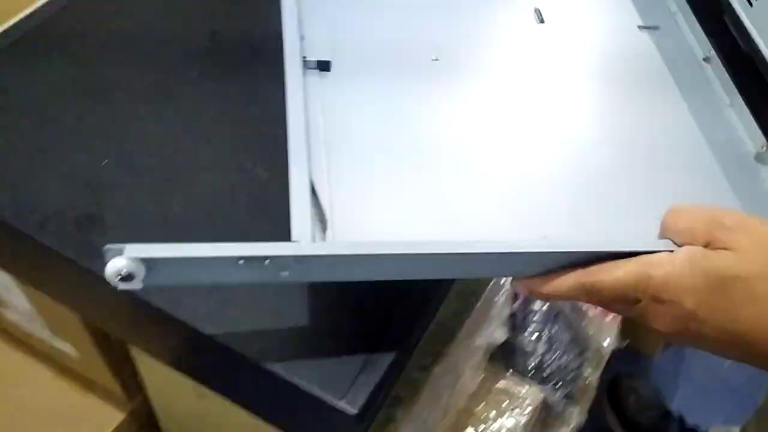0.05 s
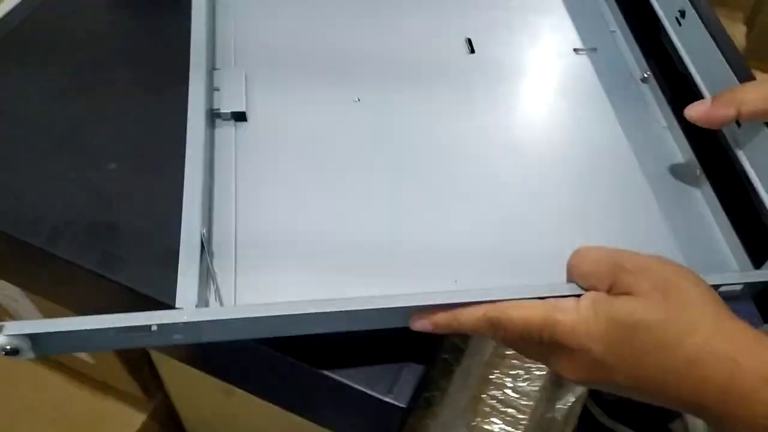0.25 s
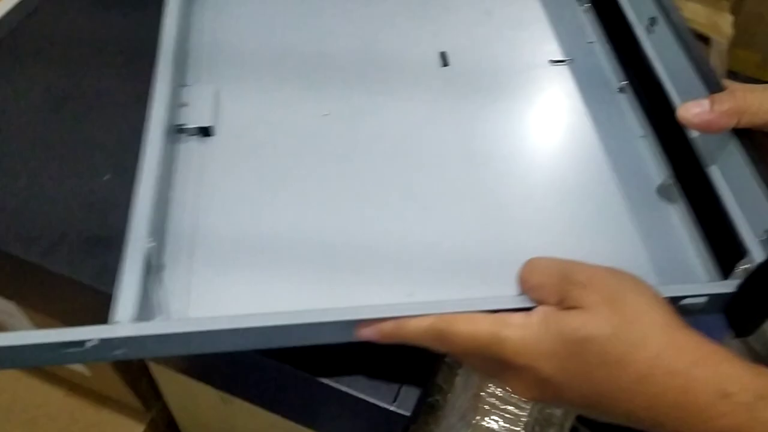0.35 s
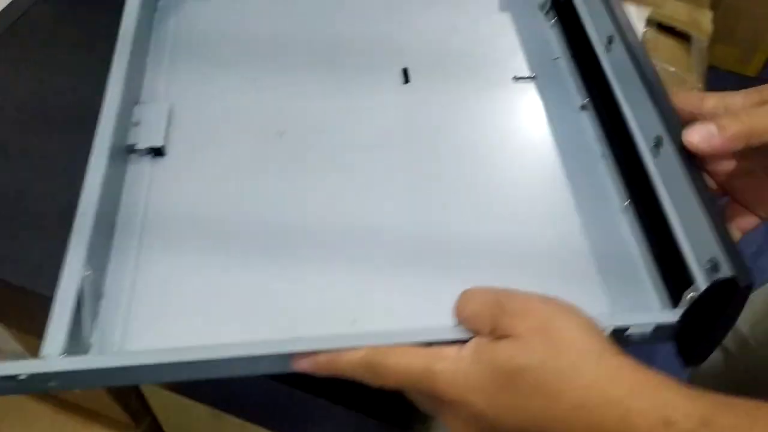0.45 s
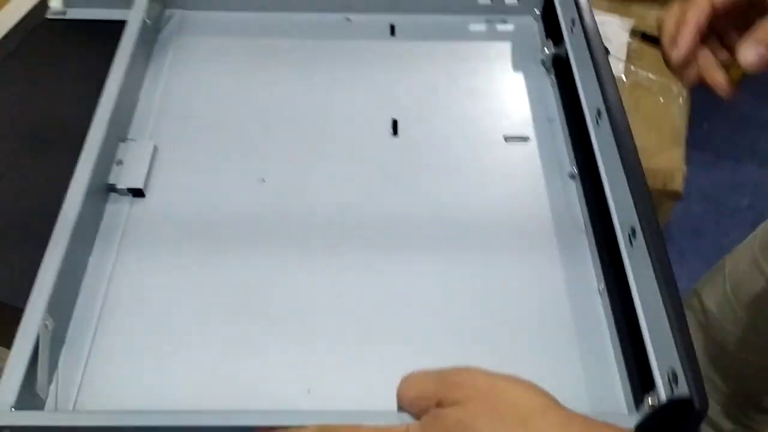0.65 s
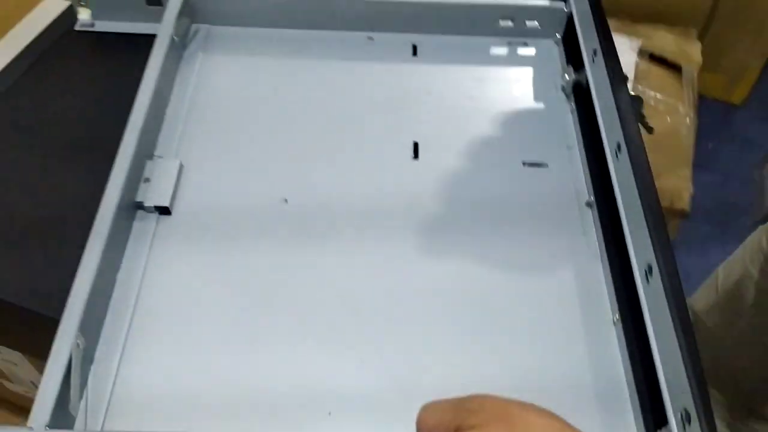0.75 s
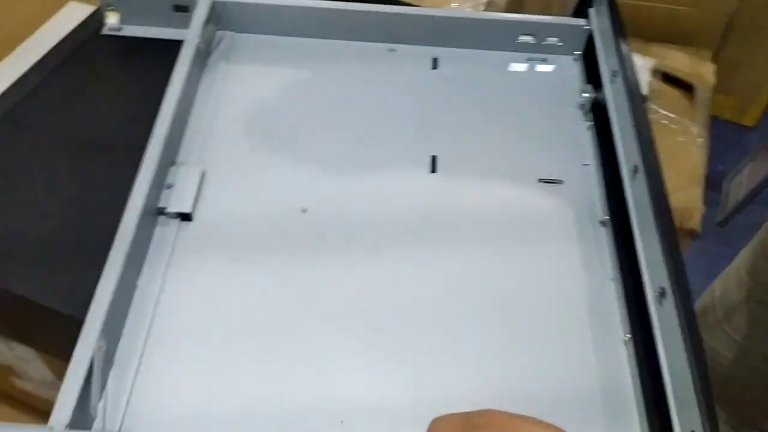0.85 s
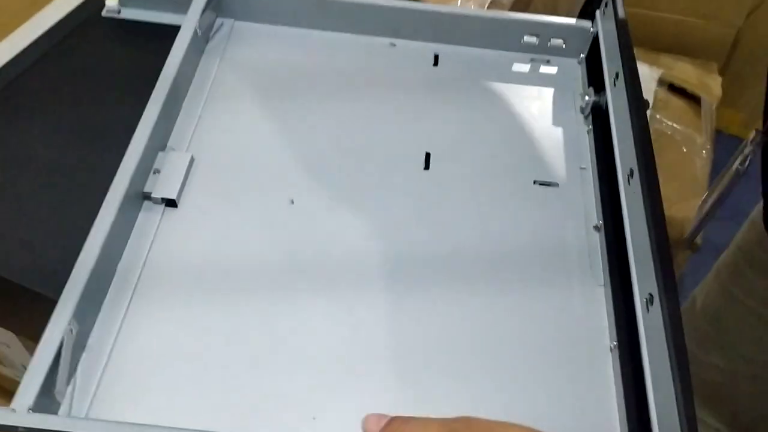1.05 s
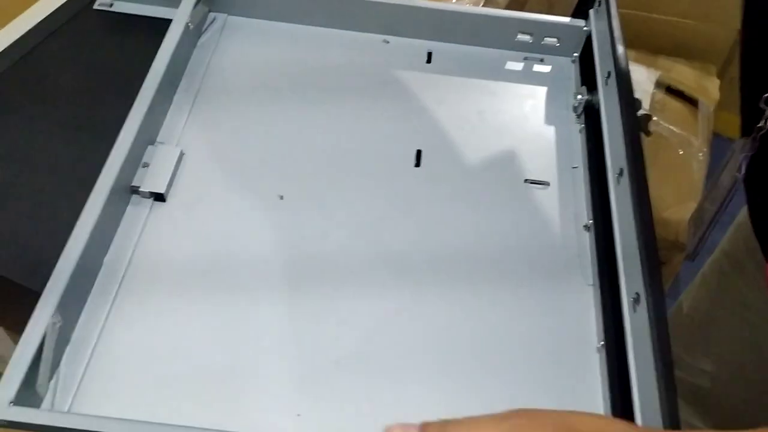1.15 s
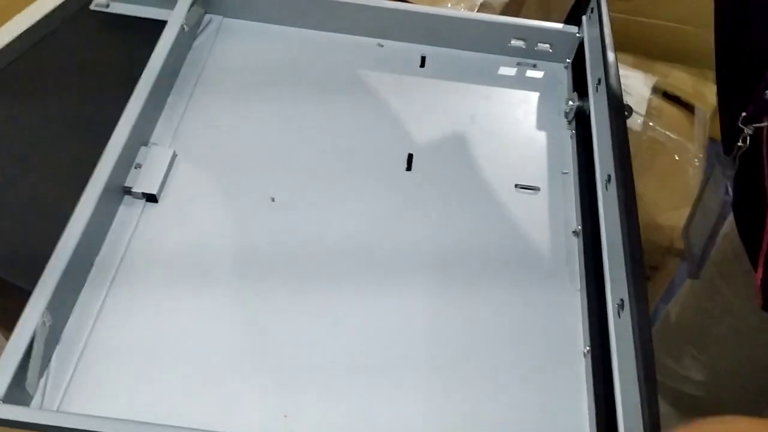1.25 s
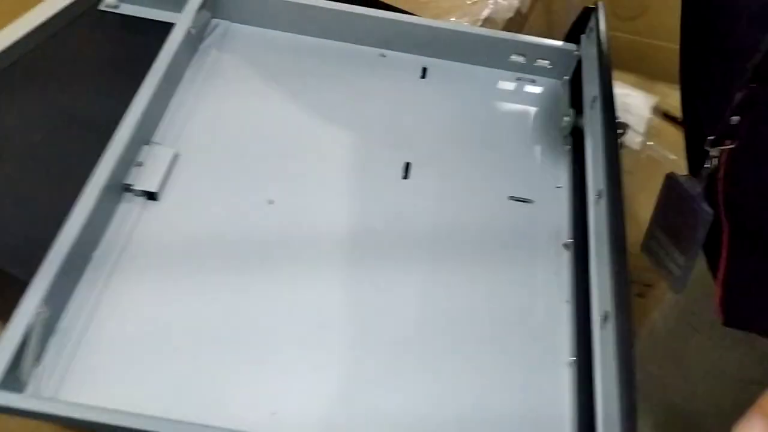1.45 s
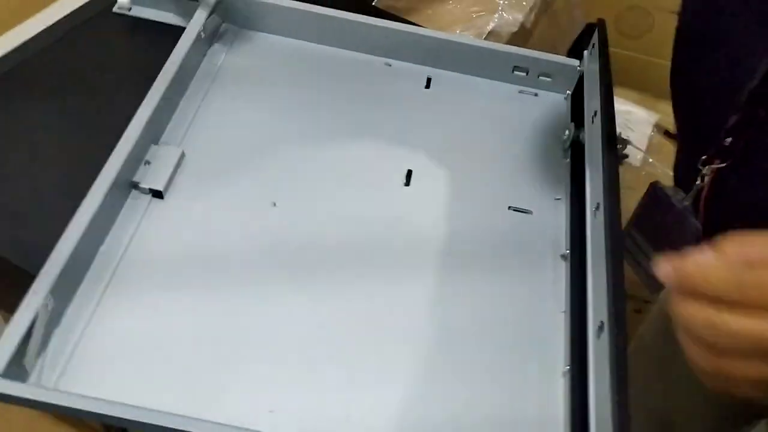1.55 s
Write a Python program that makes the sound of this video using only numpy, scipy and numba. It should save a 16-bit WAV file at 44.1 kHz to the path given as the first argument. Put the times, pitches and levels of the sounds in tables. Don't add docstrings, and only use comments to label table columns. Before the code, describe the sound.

Close up on a phone, a hollow metal tray slides with a stuttering drag, bangs down in rapid clattering hits, knocks once more, then settles to faint handling, a cloth brush and quiet indoor fan hum.

```python
import sys
import numpy as np
from scipy import signal
from scipy.fft import rfft, irfft
from scipy.io import wavfile
from scipy.ndimage import uniform_filter1d
from numba import njit

SR = 44100
rng = np.random.default_rng(int(sys.argv[2]) if len(sys.argv) > 2 else 0)


def waveform_to_disk(signal):
    frames = np.transpose(np.atleast_2d(signal))
    scaled = np.clip(frames, -1, 1) * 32767
    samples = np.round(scaled).astype(np.int16)
    wavfile.write(sys.argv[1], SR, samples)


def volts(x):
    e = np.asarray(x, float) / 20
    return 10 ** e


N = 70560

WIDE_HZ = 1410
OPPOSED = np.array([[1], [-1]])
RESTS_S = 0.509


def level(x, db):
    return x * volts(db) / np.sqrt(np.mean(x ** 2))


def curve(table):
    time_s, level_db = np.array(table).T
    return volts(np.interp(np.arange(N) / SR, time_s, level_db))


def colour_db(hz, table):
    table_hz, table_db = np.array(table).T
    return np.interp(np.log(hz), np.log(table_hz), table_db)


def walk(rate_hz):
    hold = int(SR / rate_hz)
    steps = np.repeat(rng.standard_normal(N // hold + 1), hold)
    return 1.3 * uniform_filter1d(uniform_filter1d(steps, hold), hold)[:N]


def grit(count, spread_db):
    size_db = spread_db * rng.exponential(size=count)
    return level(rng.standard_normal(count) * volts(size_db), 0)


def hiss(table, flicker_db):
    out = 0
    f = np.fft.rfftfreq(N, 1 / SR) + 1
    shape = volts(colour_db(f, table)) * (f > table[0][0])
    for hz in 25 * 2 ** np.arange(0, 9.6, 0.5):
        band = shape * np.cos(np.pi * np.clip(np.log2(f / hz), -0.5, 0.5))
        mid, side = irfft(rfft(rng.standard_normal((2, N))) * band, N)
        out = out + volts(flicker_db * walk(7.9)) * (mid + np.tanh(hz / WIDE_HZ) * side * OPPOSED)
    return level(out, 0)


@njit
def ring(x, poles, gains):
    out = np.zeros((2, len(x)))
    for m in range(len(poles)):
        z = 0j
        for i in range(len(x)):
            z = z * poles[m] + x[i]
            out[0, i] += (z * gains[0, m]).imag
            out[1, i] += (z * gains[1, m]).imag
    return out


def modes(x, hz, db, t60_s, start=None):
    in_step_hz = 888
    draw = rng.standard_normal((3, len(hz)))
    apart = np.tanh(hz / WIDE_HZ) * (np.pi / 4) * (1 + draw[0] * 1.39) * np.sign(draw[1])
    poles = np.exp(2j * np.pi * hz / SR - np.log(1000) / (t60_s * SR))
    if start is None:
        turn = 2 * np.pi * draw[2]
    else:
        turn = start + draw[2] * (hz / in_step_hz) ** 2
    gains = volts(db) * np.exp(1j * np.array([turn + apart, turn - apart]))
    return ring(x + 1e-18, poles, gains)


def width_t60_s(width_hz):
    return np.log(1000) / (np.pi * width_hz)


def dense(table, t60_low_s, t60_top_s, count):
    share = rng.random(count)
    hz = 450 + 15800 * share ** 1.5
    t60_s = (t60_low_s + (t60_top_s - t60_low_s) * share) * volts(1.2 * rng.standard_normal(count))
    db = colour_db(hz, table) + 10 * np.log10(share + 1e-3) / 2 + 1.5 * rng.standard_normal(count)
    tap = 1. * (np.arange(SR // 2) == 0)
    return modes(tap, hz, db, t60_s)


def onset(x, db):
    return x * volts(db) / np.sqrt(np.mean(x[:, :x.shape[1] // 16] ** 2))


def chatter_burst(span, chatter_s):
    t = np.arange(span) / SR
    tone = rfft(grit(count=span, spread_db=4.5) * np.exp(-t / chatter_s))
    smooth = np.sqrt(uniform_filter1d(abs(tone) ** 2, size=120))
    return irfft(tone / smooth, span) * (t < 8 * chatter_s)


def struck_panel(chatter, table, resting):
    node_hz = 240
    rest_damp, spot_db = 0.78, 0.5
    hz, mode_db, t60_s = np.array(table).T
    spot = rng.standard_normal((2, len(hz)))
    hz = hz * (1 + 0.0045 * spot[0])
    push = rfft(chatter)[(hz * len(chatter) / SR).astype(int)]
    even_db = -20 * np.log10(abs(push) + 0.073)
    if resting:
        t60_s = t60_s * rest_damp
    start = np.pi * (hz > node_hz) - np.angle(push)
    return modes(chatter, hz, mode_db + even_db + spot_db * spot[1], t60_s, start)


def tray():
    # (time [s], floor [dB], rails [dB], sheet [dB], chatter [s])
    knocks = [(0.0142, -74, -48, -48, 0.0039), (.398, -43.5, -41.5, -39, 0.0037),
              (0.4196, -40.5, -64, -28.5, 0.016), (0.4281, -25.5, -28.5, -37, 0.0032),
              (0.432, -26.5, -23, -32.5, 0.0042), (.446, -28, -36.5, -35, 0.0051),
              (0.469, -26.5, -34, -33, 0.012), (0.564, -39, -55, -40.5, 0.013),
              (.637, -76, -63, -45.5, 0.0057), (0.68, -58, -52, -49.5, 0.0048),
              (0.6877, -47, -38, -67, 0.014), (0.734, -42, -51.5, -61, 0.034),
              (0.779, -44, -59, -60, 0.037), (.9226, -38, -52, -29, 0.013),
              (0.9278, -28, -46, -34.5, 0.0076), (0.968, -38.5, -49.5, -37, 0.005),
              (1.0514, -77, -72, -48, 0.0037), (1.124, -46.5, -58, -51, 0.015),
              (1.169, -50.5, -69, -72, 0.023), (1.408, -55, -70, -55, 0.011),
              (1.502, -82, -74, -58.5, 0.011)]
    # (frequency [Hz], level [dB], t60 [s])
    free_floor = [(71.2, -14.5, 0.3), (134, -50, 0.4), (164.4, -14, 0.63), (185, -21, 0.29),
                  (208, -9.5, 0.67), (227, -9, 0.2), (239.2, -9, 0.2), (256.7, -7, 0.96), (279.9, 1, 0.27),
                  (303, -48, .2), (328.3, -7, 0.14), (386.5, -11, 0.75), (432.3, -10.5, 0.63),
                  (457, -15.5, 0.17)]
    # (frequency [Hz], level [dB], t60 [s])
    resting_floor = [(69, -16.5, 0.22), (110, -25, 0.86), (138, -17, 1), (156, -16.5, 1), (195, -6, 0.31),
                     (213, -4, 0.29), (227, -3.5, 0.16), (249, -7, 0.068), (276.6, 0.5, 0.19),
                     (395.6, -16, 0.53), (461, -20, 0.55), (498, -26, 0.17), (701, -17.5, 0.34),
                     (1030, -18.5, 0.38)]
    # (frequency [Hz], level [dB], t60 [s])
    rails = [(694, -19, 0.3), (741.6, -1, 0.12), (1016, -18, 0.11), (1152.4, -7, 0.078), (1276, -2, 0.073),
             (1425, 0.5, 0.08), (1590.5, 3.5, 0.094), (1710, -10, 0.15), (1992, -1, 0.061),
             (2196, -9, 0.079), (2600, -2.5, 0.057), (2690, -8, 0.057), (3052, -14, 0.17),
             (3410, -3.5, 0.062)]
    # (frequency [Hz], level [dB])
    sheet_colour = [(500, -7), (1400, -7.5), (3000, -8.5), (5000, -7), (8000, -4), (11000, -3.5),
                    (13500, -11), (16000, -9.5)]
    # (frequency [Hz], level [dB])
    side_colour = [(450, -3), (800, -1.5), (1300, -0.5), (2000, -3), (3200, -7), (7000, -27.5),
                   (16000, -26)]
    sides_db, crack_db, crack_s = -4.5, -3, 0.0049
    catch_db_per_s, catch_db = 250, -6.5

    span = SR // 2
    t = np.arange(span) / SR
    out = np.zeros((2, N + SR))
    sheet = dense(sheet_colour, t60_low_s=0.4, t60_top_s=0.17, count=2200)
    sides = dense(side_colour, t60_low_s=0.32, t60_top_s=0.16, count=1000)
    for s, floor_db, rails_db, sheet_db, chatter_s in knocks:
        resting = s > RESTS_S
        chatter = chatter_burst(span, chatter_s)
        knock = onset(signal.fftconvolve(chatter[None], sheet)[:, :span], sheet_db)
        knock = knock + onset(signal.fftconvolve(chatter[None], sides)[:, :span], rails_db + sides_db)

        contact = (chatter * np.exp(-t / crack_s))[None]
        crack = signal.fftconvolve(contact, sheet[:, :SR // 400])[:, :span]
        long_chatter_db = 20 * np.log10(max(chatter_s / crack_s, 1))
        knock = knock + onset(crack, sheet_db + crack_db - long_chatter_db)

        caught = volts(np.clip(-catch_db_per_s * (s + t - RESTS_S), catch_db, 0) * (s < RESTS_S))
        floor = resting_floor if resting else free_floor
        for table, db in ((floor, floor_db), (rails, rails_db)):
            knock = knock + onset(struck_panel(chatter, table, resting), db) * caught
        first = int(s * SR)
        out[:, first:first + span] += knock
    return out[:, :N]


def slide():
    # (time [s], level [dB])
    drag = [
        (.05, -55),
        (.09, -39.5),
        (.14, -38),
        (.22, -38),
        (.28, -43.5),
        (.34, -45.5),
        (.38, -48.5),
        (.42, -56),
    ]
    # (frequency [Hz], width [Hz], level [dB])
    box = [(161, 86, 8), (212, 62, -10.5), (326, 38, -5), (487, 113, 2), (550, 100, -12), (650, 62, 1),
           (712, 114, -5.5), (784, 200, 11.5), (970, 160, -6), (978, 124, -0.5), (1020, 110, -15)]
    slips_per_s = 4100
    slips = (rng.random(N) < slips_per_s / SR) * rng.standard_normal(N) * volts(0.39 * walk(47.8))
    hz, width_hz, db = np.array(box).T
    return level(modes(slips, hz, db, width_t60_s(width_hz)), 0) * curve(drag)


def rub():
    # (time [s], level [dB])
    rubbing = [(0, -47.5), (.05, -42), (.2, -44.5), (.38, -45.5), (.6, -48.5), (.7, -45), (.8, -54.5),
               (.9, -55), (1.1, -55.5), (1.2, -58.5), (1.35, -59.5), (1.5, -58.5), (1.6, -60)]
    # (frequency [Hz], density [dB per Hz])
    skin = [(900, -10), (1500, -1), (2300, 1.5), (3500, -1.5), (6000, -5), (8200, -2.5), (11500, -13.5),
            (16000, -18)]
    return hiss(skin, flicker_db=3.0) * curve(rubbing) * volts(0.26 * walk(23.7))


def latch():
    # (frequency [Hz], level [dB], t60 [s])
    spring = [(800, -18, .05), (943, 2.5, 0.1), (1240, -4, 0.043), (1660, 8.5, 0.066), (1896, -4, 0.059),
              (2380, -7, .05), (2770, 5, 0.042), (3300, -10, .05), (4280, -6, .05), (5640, -5, 0.046)]
    # (time [s], level [dB], chatter [s])
    ticks = [
        (0.0148, -41.5, 0.00028),
        (0.02, -46.5, 0.00031),
    ]
    t = np.arange(N) / SR
    out = 0
    for s, db, chatter_s in ticks:
        burst = grit(count=N, spread_db=3.5) * (t > s) * np.exp(-abs(t - s) / chatter_s)
        tick = modes(burst, *np.array(spring).T)
        out = out + tick * volts(db) / np.sqrt(np.sum(tick ** 2) / (SR // 10))
    return out


def sleeve():
    # (frequency [Hz], density [dB per Hz])
    cloth = [(900, -6), (2500, -14.5), (5000, -11.5), (8000, -5), (12000, -8.5), (16000, -15)]
    start_s, attack_s, hold_s, release_s = 1.384, 0.014, 0.07, 0.023
    t = np.arange(N) / SR - start_s
    shape = np.clip(t / attack_s, 0, 1) * np.exp(-np.maximum(t - hold_s, 0) / release_s)
    return hiss(cloth, flicker_db=0.5) * shape * volts(-50.5)


def grip():
    # (time [s], level [dB])
    rumble = [(0.0, -42.5), (0.102, -57), (0.114, -40.5), (0.258, -36), (0.27, -46), (0.418, -59),
              (0.444, -52), (0.516, -35.5), (0.542, -52), (0.778, -46), (0.836, -83), (0.854, -71),
              (1.024, -44.5), (1.314, -55.5), (1.542, -59), (1.6, -58)]
    centre_hz, width_hz = 60.5, 31
    f = np.fft.rfftfreq(N, 1 / SR)
    band = 1 / (1 + ((f - centre_hz) / width_hz * 2) ** 2)
    mid, side = irfft(rfft(rng.standard_normal((2, N))) * band, N)
    return level(mid + 0.16 * side * OPPOSED, 0) * curve(rumble)


def room_echo(near):
    t60_s, damp, room_db = 0.77, 0.5, -24
    lags = rng.integers(500, 2600, 8)
    room = echo_lines(near[0], lags, volts(-60 * lags / SR / t60_s), damp)
    mid = room.mean(0)
    side = signal.lfilter(*signal.butter(1, 500, "high", fs=SR), room - mid)
    return volts(room_db) * (mid + side)


@njit
def echo_lines(x, lags, gain, damp):
    line, soft, out = np.zeros((8, 4096)), np.zeros(8), np.zeros((2, len(x)))
    for i in range(len(x)):
        total = 0.
        for k in range(8):
            soft[k] += (1 - damp) * (gain[k] * line[k, (i - lags[k]) & 4095] - soft[k])
            total += soft[k]
            out[k % 2, i] += soft[k]
        for k in range(8):
            line[k, i & 4095] = x[i] + soft[k] - total / 4
    return out


def hum():
    # (frequency [Hz], width [Hz], level [dB])
    housing = [(236, 18, 5), (313, 37, -1), (372, 31, 1.5), (463, 6, 8.5), (699, 32, -9), (1020, 20, -18)]
    # (time [s], level [dB])
    hum_level = [(0, -54), (.4, -63), (.9, -57.5), (1.3, -61), (1.52, -58), (1.6, -59)]
    hz, width_hz, db = np.array(housing).T
    air = rng.standard_normal(N)
    return level(modes(air, hz, db + 10 * np.log10(width_hz), width_t60_s(width_hz)), 0) * curve(hum_level)


def store_air():
    # (frequency [Hz], density [dB per Hz])
    store = [(40, -3), (110, -10), (250, -10), (500, -27), (1200, -45.5), (4000, -53), (11000, -42),
             (16000, -50)]
    return volts(-52) * hiss(store, flicker_db=-1.0)


def scene():
    near = tray() + slide()
    hands = rub() + latch() + sleeve() + grip()
    return near + hands + room_echo(near) + hum() + store_air()


def band_limit(x):
    return signal.sosfilt(signal.butter(12, 16640, fs=SR, output="sos"), x)


def record(dry):
    x = signal.sosfilt(signal.butter(6, 42, "high", fs=SR, output="sos"), dry)
    x = signal.sosfilt(signal.ellip(10, 0.2, 95, 16000, fs=SR, output="sos"), x)
    return band_limit(x)


dry = scene()
out = record(dry)
waveform_to_disk(out)
```